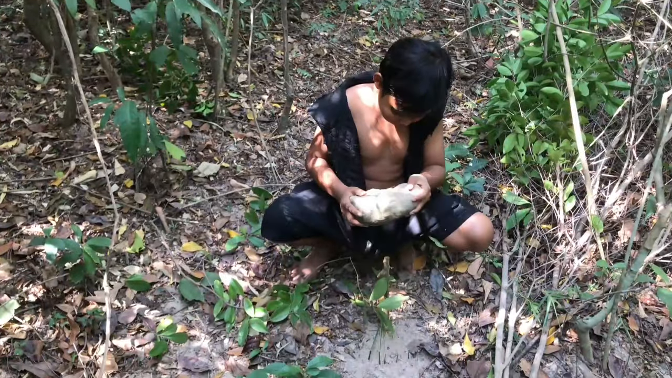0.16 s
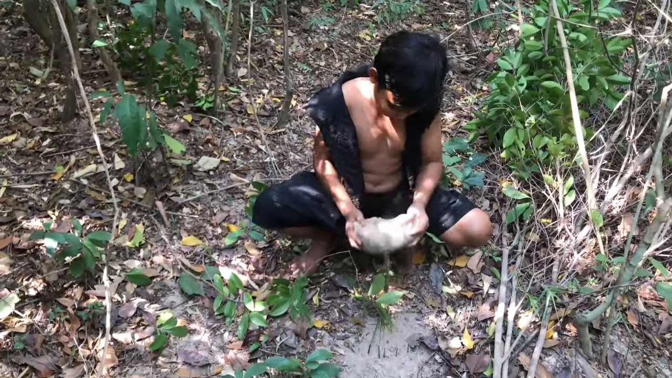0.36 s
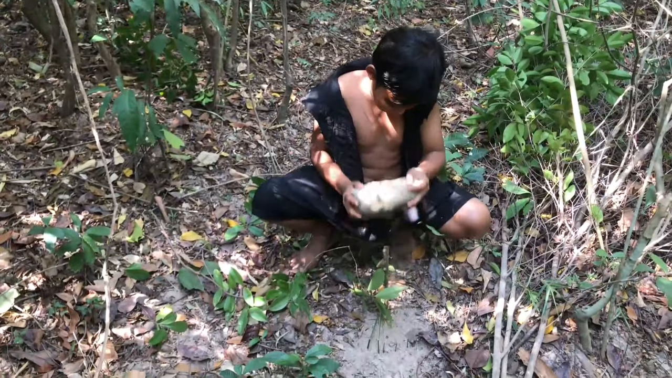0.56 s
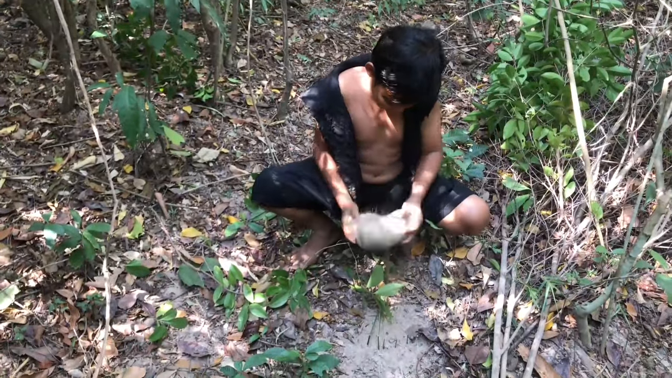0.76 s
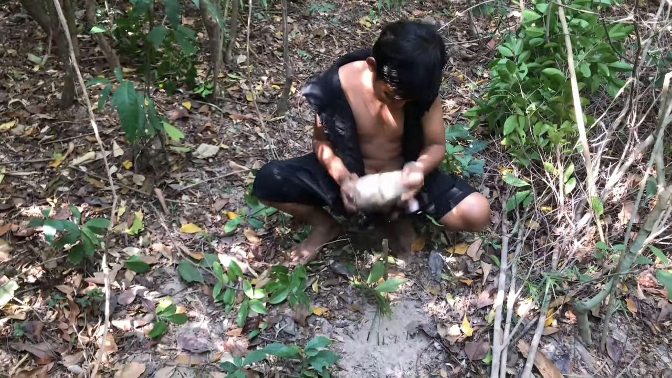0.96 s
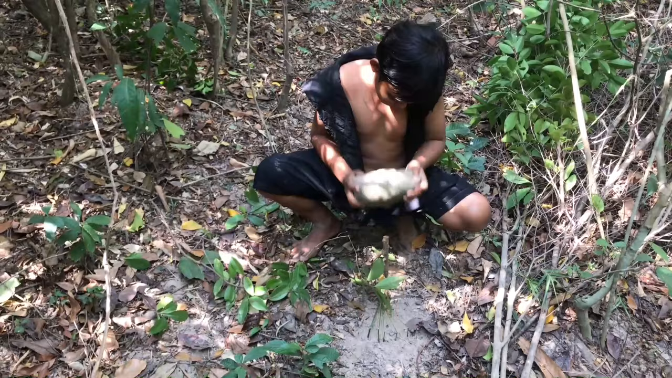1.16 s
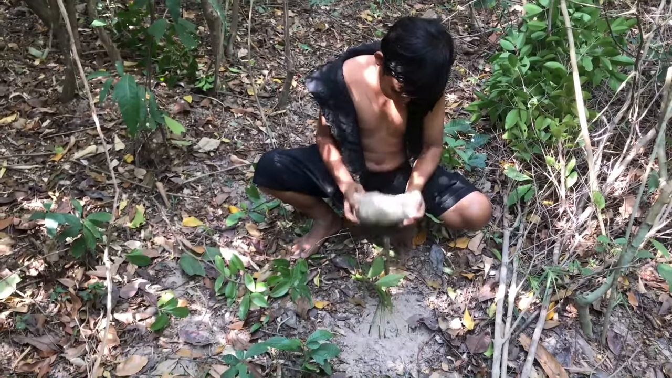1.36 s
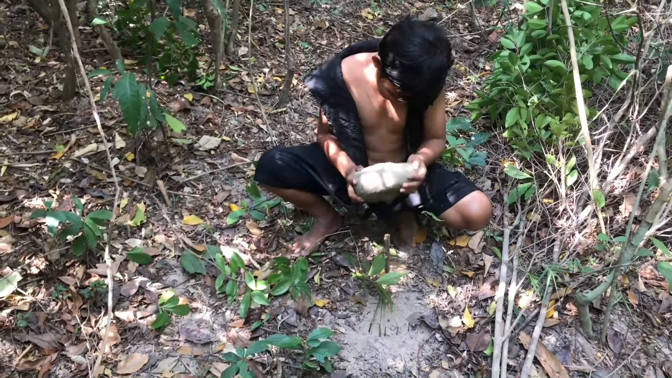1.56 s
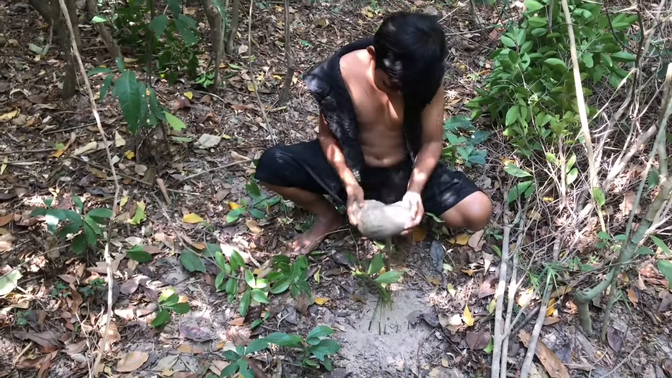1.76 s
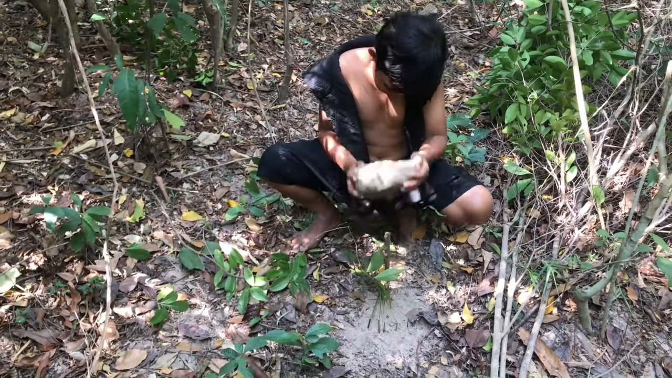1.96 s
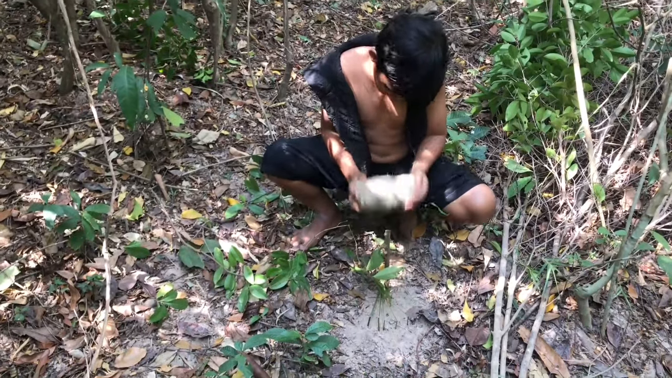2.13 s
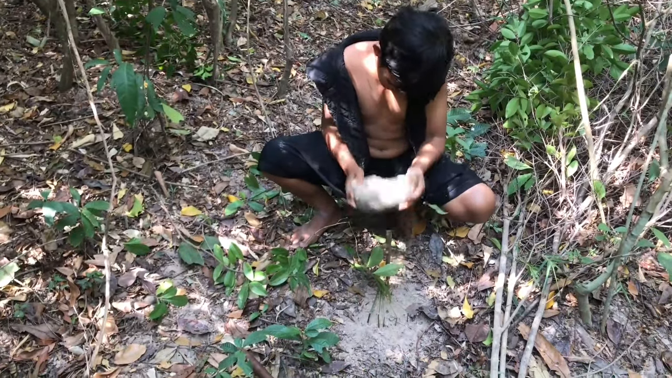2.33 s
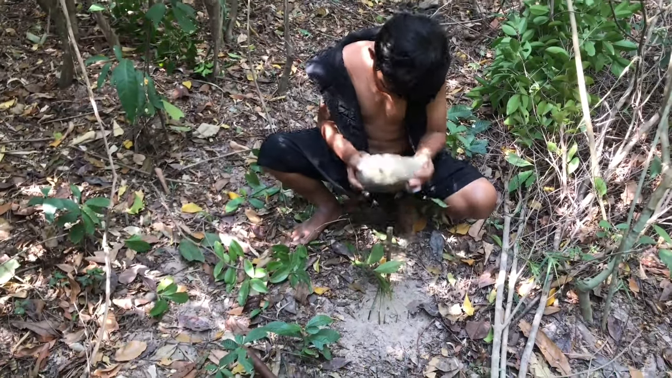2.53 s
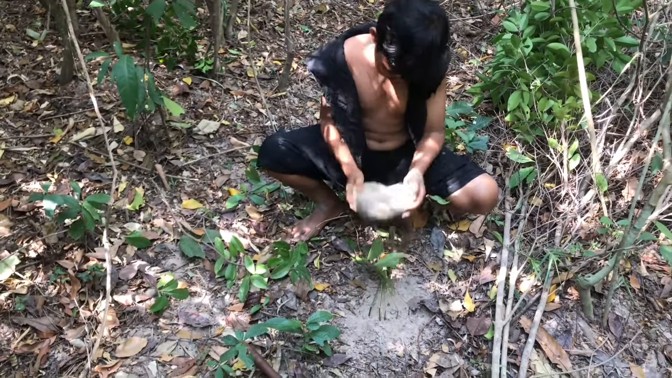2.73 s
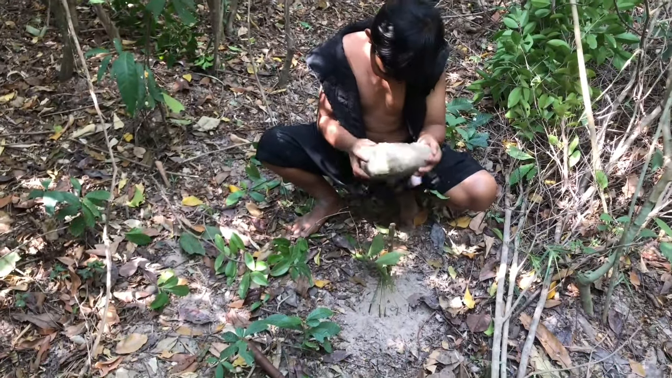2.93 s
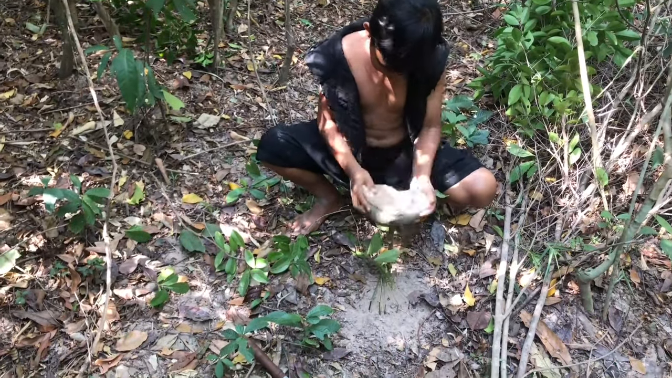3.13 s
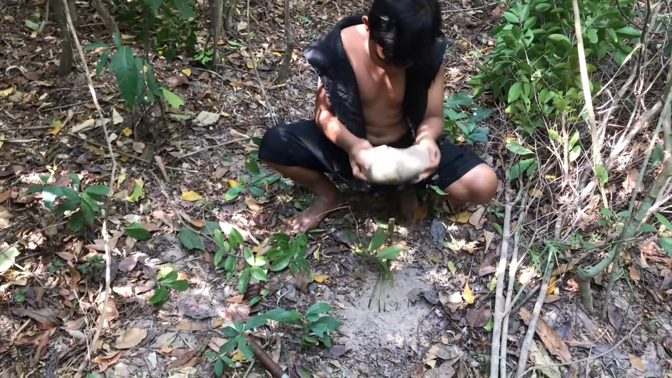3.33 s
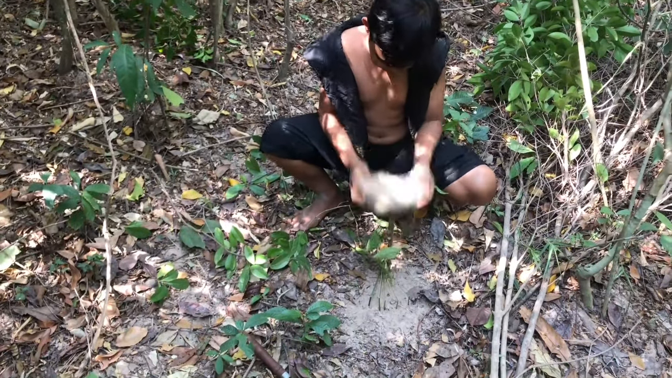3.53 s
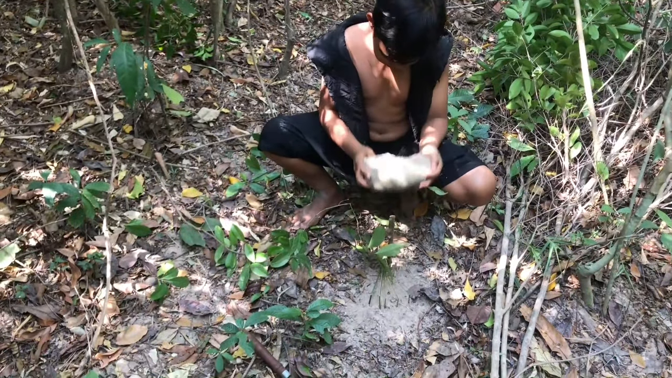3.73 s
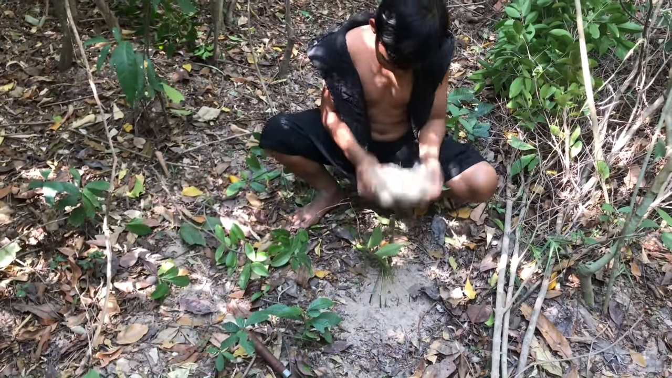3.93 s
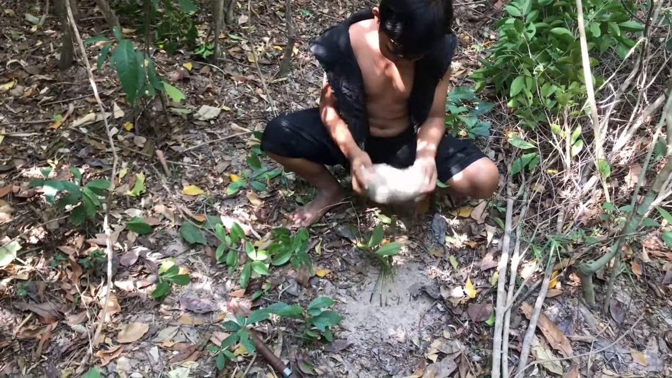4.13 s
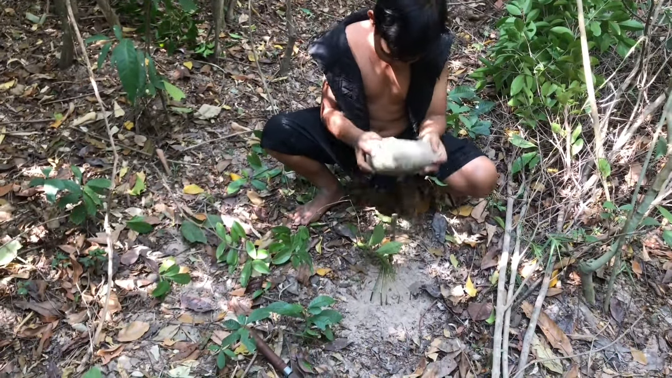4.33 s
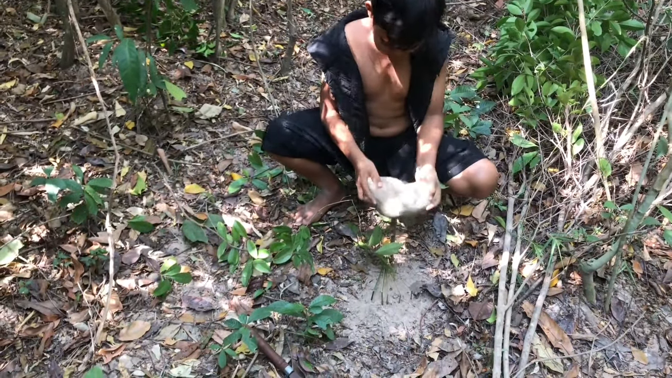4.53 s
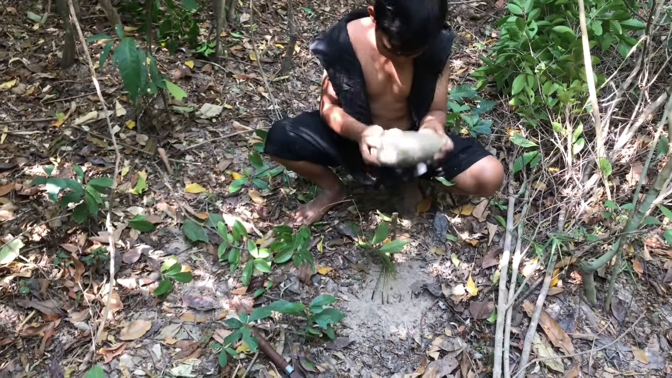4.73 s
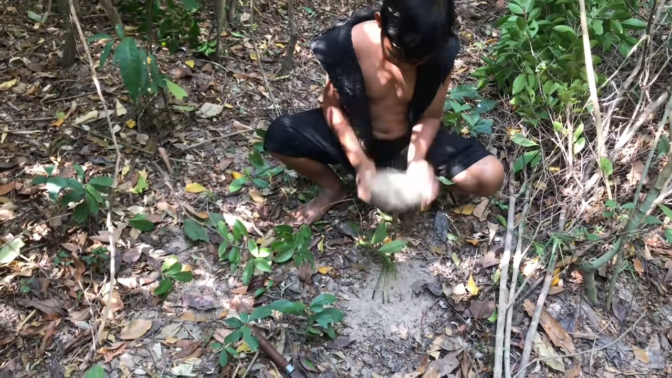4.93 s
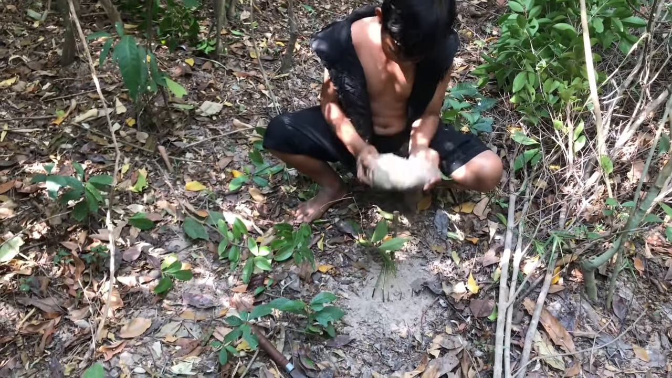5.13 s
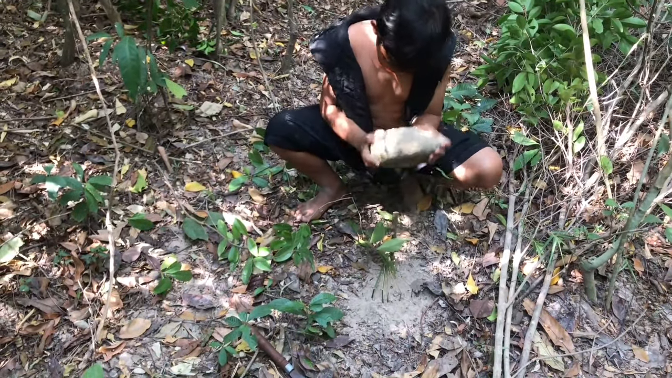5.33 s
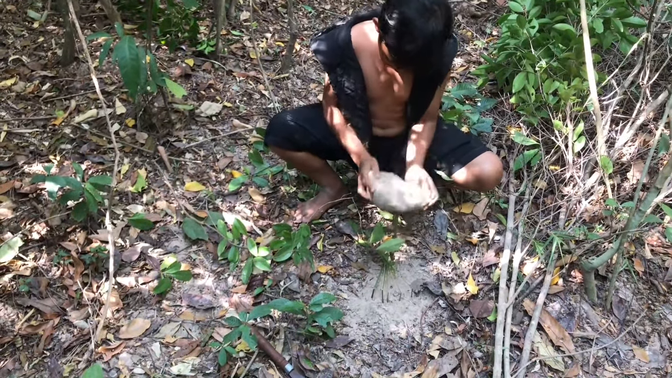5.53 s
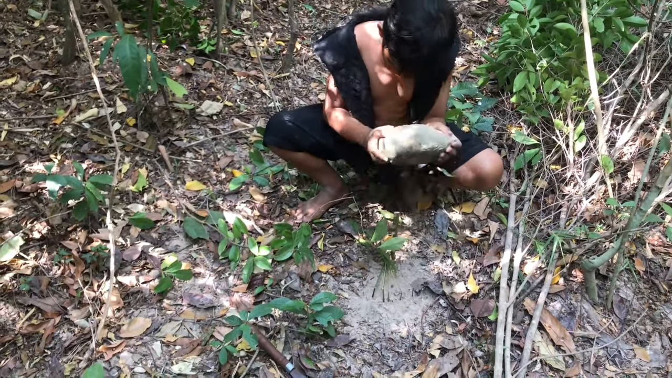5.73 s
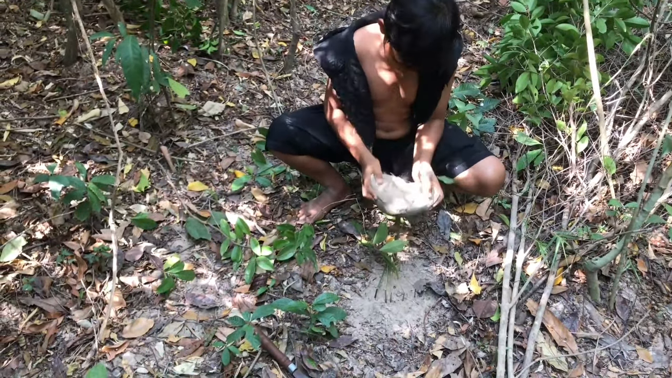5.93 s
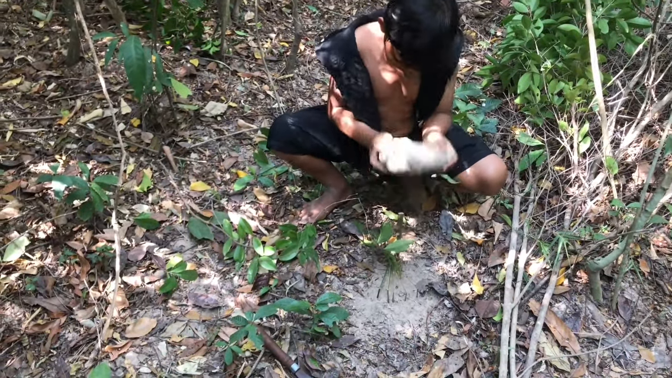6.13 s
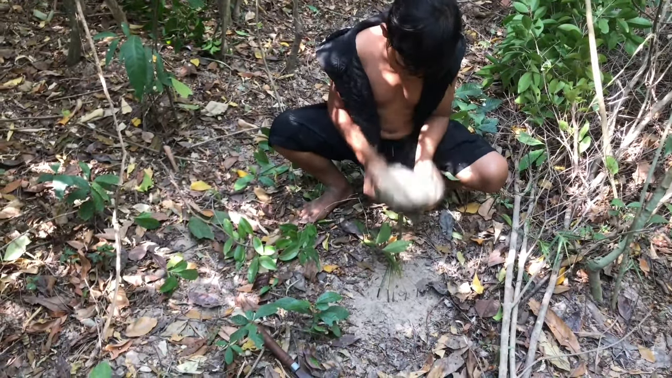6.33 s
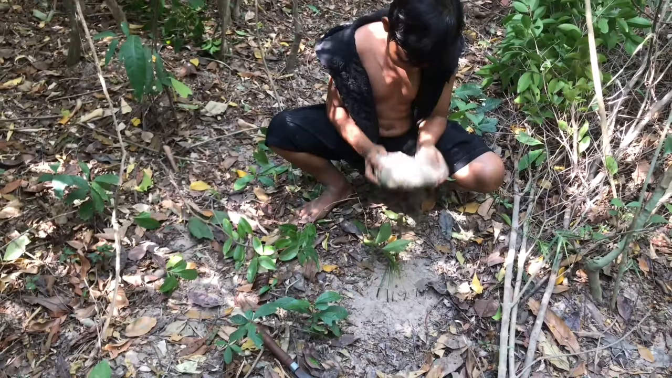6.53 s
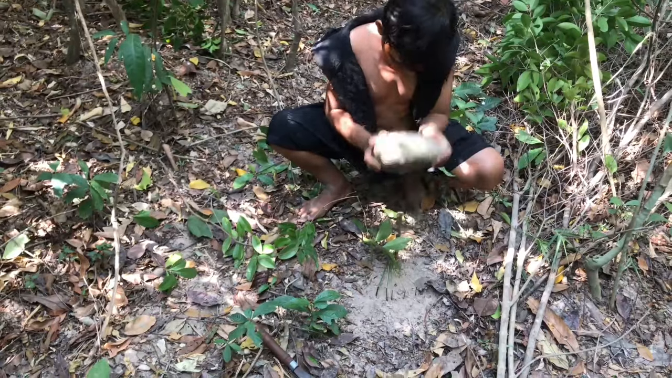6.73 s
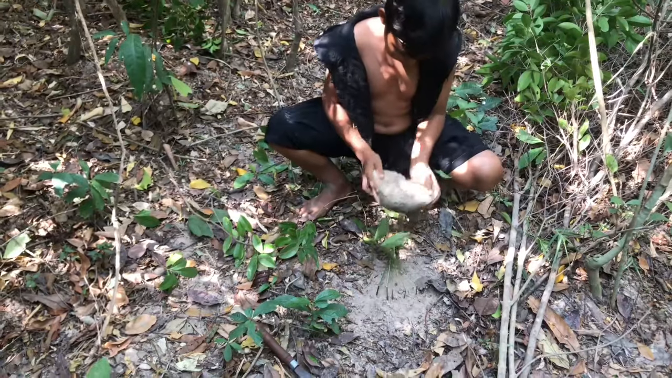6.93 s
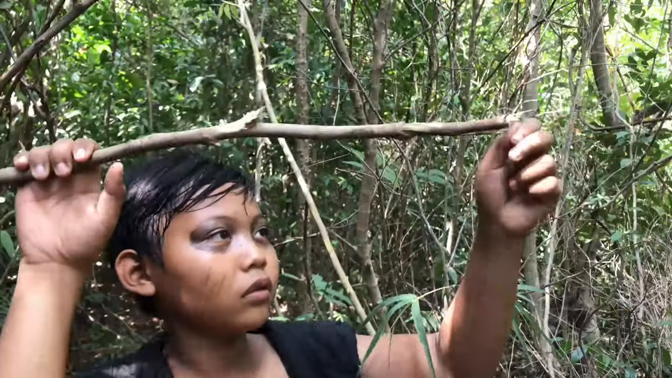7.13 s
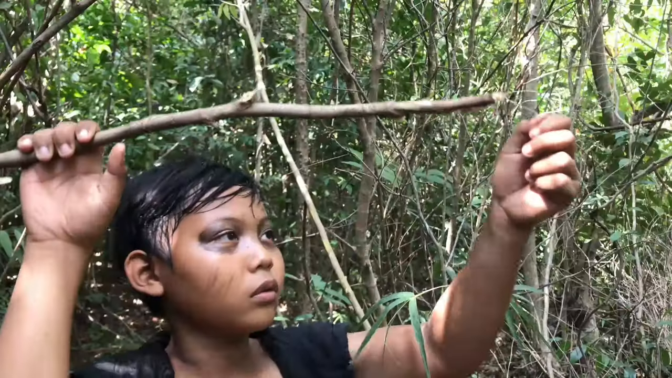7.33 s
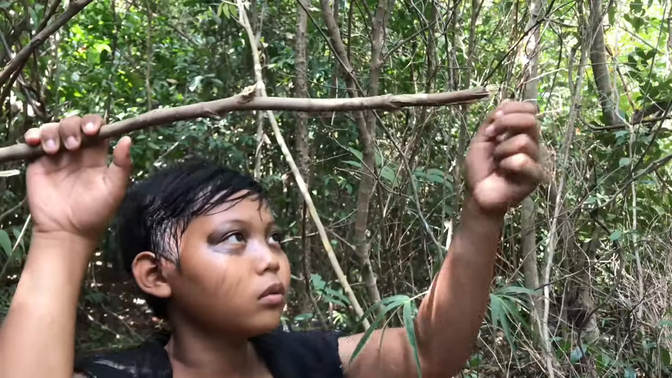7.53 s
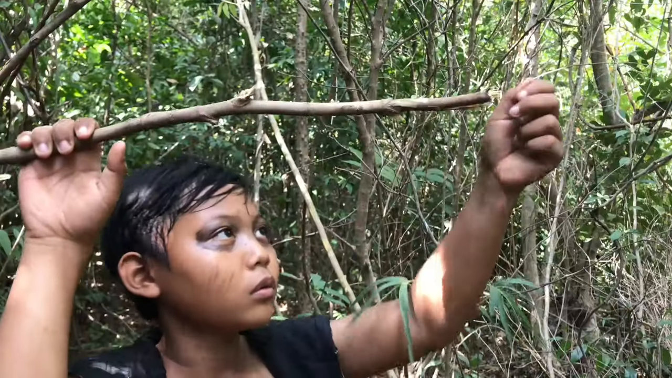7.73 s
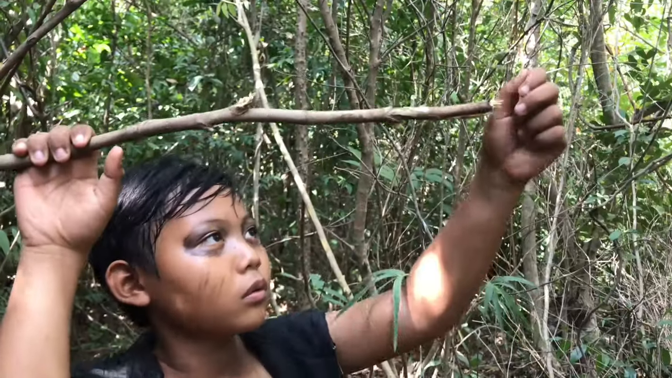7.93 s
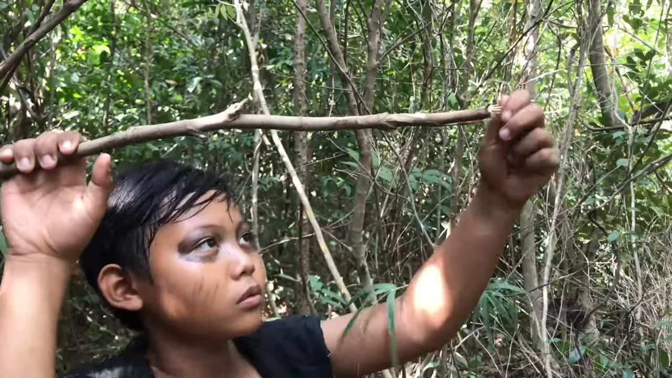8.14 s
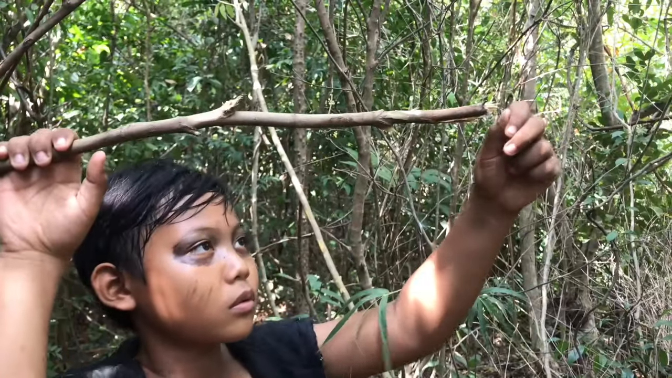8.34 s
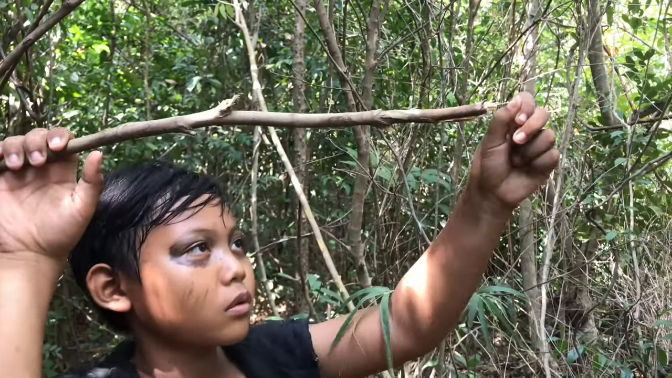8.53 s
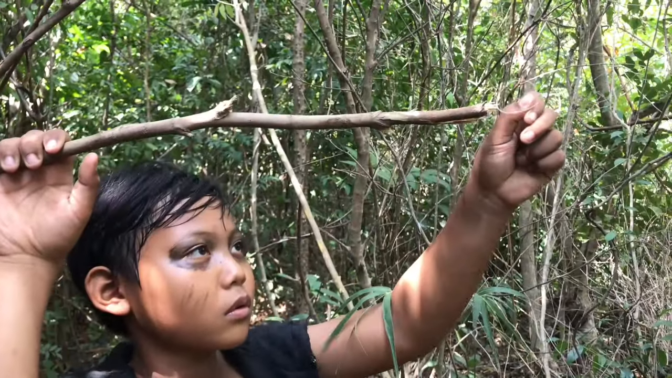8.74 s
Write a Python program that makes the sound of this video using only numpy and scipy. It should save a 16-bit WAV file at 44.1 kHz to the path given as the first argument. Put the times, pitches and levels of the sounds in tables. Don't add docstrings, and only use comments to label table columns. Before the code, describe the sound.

Fifteen regular blows of stone on wood and ground, light at first and harder toward the end, with bounces and small dry leaf ticks around them. Low bumps shake the microphone stand late on. At seven seconds the pounding cuts off with a tiny click, leaving a distant wavering engine hum, soft air noise, microphone hiss and sparse leaf rustles. Open woodland, little echo.

```python
import sys
import numpy as np
from scipy import signal
from scipy.fft import rfft, irfft
from scipy.io import wavfile
from scipy.ndimage import uniform_filter1d

SR = 44100
rng = np.random.default_rng(int(sys.argv[2]) if len(sys.argv) > 2 else 0)


def amplitude_ratio(level_db):
    exponent = np.asarray(level_db, float) / 20
    return 10 ** exponent


def pcm_store(signal):
    levels = np.round(np.clip(np.atleast_2d(signal), -1, 1) * 32767)
    wavfile.write(sys.argv[1], SR, levels.astype(np.int16).T)


N = 387198
CUT_S = 7.0232

# (time [s], level [dB], upper level [dB], upper frequency [Hz], hiss level [dB])
CRACKS = [(.3007, -30, 3, 3780, -15), (.7504, -38, 1, 3750, -14), (1.2198, -39.5, 7, 6260, 4),
          (1.6967, -38, 0, 4670, 3.5), (2.1552, -31, -10, 3470, -11), (2.5929, -28.5, -5, 4300, -9),
          (3.0745, -28.5, -6, 4930, -8), (3.5295, -34, -6, 3740, -1.5), (3.96, -33.5, -3, 3680, -11),
          (4.4412, -28, -13, 3770, -12), (4.9462, -28, -11, 3200, -16), (5.4222, -34, .5, 3530, -13),
          (5.8847, -27.5, -5, 3160, -13), (6.344, -29, 0, 3810, -5), (6.8014, -32, 4, 3200, -17)]
# (time [s], level [dB], upper level [dB], upper frequency [Hz], hiss level [dB])
CRACK_BOUNCES = [(1.225, -30.5, -3.5, 3450, -8), (1.704, -40, 2, 6400, -11), (2.1623, -30.5, -1, 3600, -15),
                 (2.6018, -29, -7, 3470, -14), (2.6105, -39, -13, 3670, -17), (3.9629, -33.5, -5, 4930, 3),
                 (3.9718, -30.5, -6, 3500, -21), (4.4585, -50, -6, 4340, 9.5), (5.4245, -35, 1, 4400, 6),
                 (5.4285, -47, 3, 4730, 5), (5.891, -44, 5.5, 3630, -3), (5.993, -52, -5, 3360, -6),
                 (6.354, -33, -9, 3630, -20), (6.8052, -39.5, 18, 3450, 9), (6.8945, -45, -5, 3130, -18)]


def evened(x):
    return x / np.sqrt(np.mean(x ** 2) + 1e-20)


def read(points, hz):
    f, value = np.transpose(points)
    return np.interp(np.log(hz + 1), np.log(f + 1), value)


def add(mix, s, sound):
    part = mix[round(s * SR):][:len(sound)]
    part += sound[:len(part)]


def band(x, lo_hz, hi_hz):
    sos = signal.butter(2, [lo_hz, min(hi_hz, SR / 2.1)], "band", fs=SR, output="sos")
    return signal.sosfilt(sos, x)


def shaped(spectrum, patchy_db):
    frames, hz = N // 256 + 5, np.fft.rfftfreq(1024, 1 / SR)
    real, imag, patches = rng.standard_normal((frames, 513, 3)).T
    patches = uniform_filter1d(patches, size=12, axis=0)
    patches = evened(uniform_filter1d(patches, size=10, axis=1))
    z = (real + 1j * imag) * amplitude_ratio(read(spectrum, hz)[:, None] + patchy_db * patches)
    return evened(signal.istft(z, nperseg=1024, noverlap=768)[1][:N])


def drone(modes):
    hz = np.fft.rfftfreq(N, 1 / SR)
    gain = sum(amplitude_ratio(db) / (1 + (2 * (hz - f) / width) ** 2) for f, width, db in modes)
    return evened(irfft(rfft(rng.standard_normal(N)) * gain, N))


def envelope(t, rise, t60):
    e = (1 - np.exp(-t / max(rise, 1e-5))) ** 2 * amplitude_ratio(-60 * t / max(t60, 1e-3))
    return e / e.max()


def mode(t, hz, t60, rise):
    return np.sin(2 * np.pi * hz * t) * envelope(t, rise, t60)


def swells(rows, rest_db):
    t = np.arange(N) / SR
    power = sum(amplitude_ratio(2 * db) * np.exp(-2 * ((t - s) / half) ** 2) for s, half, db in rows)
    return np.sqrt(amplitude_ratio(2 * rest_db) + power)


def wind():
    # (middle [s], half length [s], level [dB])
    gusts = [(1.2, .3, -52), (2.08, .2, -53), (3.42, .2, -52), (.35, .15, -55), (5.68, .08, -52),
             (1.0, .08, -50), (6.17, .08, -49), (8.2, .4, -54), (4.25, .2, -54), (5.92, .17, -44),
             (6.55, .17, -49)]
    # (frequency [Hz], width [Hz], level [dB])
    rumble = [(50, 9, 2), (80, 17, 0), (130, 30, -9)]
    return swells(gusts, rest_db=-57) * drone(rumble)


def engine():
    # (frequency [Hz], width [Hz], level [dB])
    hum = [(263.8, 26, 0), (296, 13, -10), (334.7, 17.4, -4)]
    level_db, waver_db, after_cut_db = -53, 1.5, -2
    t = np.arange(N) / SR
    rates_hz = np.geomspace(.3, 3, num=12)
    waver = evened(sum(np.sin(2 * np.pi * (f * t + rng.random())) / np.sqrt(f) for f in rates_hz))
    return amplitude_ratio(level_db + waver_db * waver + after_cut_db * (t > CUT_S)) * drone(hum)


def distant_air():
    # (frequency [Hz], level [dB per Hz])
    air = [(18, -44), (30, -15), (75, -8), (197, -12.5), (265, -1), (349, -9), (400, -13), (490, -14.5),
           (520, -17.5), (570, -16.5), (680, -22.5), (1290, -26.5), (1500, -34), (1950, -68)]
    level_db, after_cut_db = -56, -1
    gain = amplitude_ratio(level_db + after_cut_db * (np.arange(N) > CUT_S * SR))
    return gain * shaped(air, patchy_db=1.5)


def hiss():
    # (frequency [Hz], level [dB per Hz])
    hiss_spectrum = [(900, -20), (1500, 9), (2000, 6.5), (3000, 2.5), (5000, 1), (8000, -3), (10000, -3.5),
                     (14000, -6.5), (14700, -3), (15550, -11), (15850, -46)]
    return amplitude_ratio(-72) * shaped(hiss_spectrum, patchy_db=0.8)


def leaf_rustle():
    # (middle [s], half length [s], level [dB])
    stirs = [(.02, .1, -68), (.54, .05, -56), (.66, .07, -63.5), (.76, .03, -59), (1.06, .12, -65),
             (1.26, .09, -64), (2.08, .12, -64), (2.5, .12, -70.5), (3.4, .3, -73), (5.1, .15, -72),
             (5.47, .07, -62), (5.92, .07, -64.5), (6.9, .25, -71), (7.41, .1, -65.5), (7.99, .03, -67),
             (8.25, .03, -69.5), (7.6, .2, -72), (8.48, .03, -69), (8.76, .08, -67)]
    # (frequency [Hz], level [dB])
    leaf_spectrum = [(1500, -8), (3000, 1), (5000, -1.5), (8000, -2.5), (11500, -4.5), (14000, 0),
                     (15700, -2), (15950, -29)]
    t = np.arange(1500) / SR
    strength_db = 4 * np.minimum(rng.exponential(1, N), 3)
    crackle = amplitude_ratio(strength_db) * (rng.random(N) < 400 / SR)
    crackle = .75 + evened(signal.oaconvolve(crackle, amplitude_ratio(-60 * t / .009))[:N])
    return amplitude_ratio(-5) * swells(stirs, rest_db=-77) * evened(crackle * shaped(leaf_spectrum, patchy_db=2))


def leaf_snaps():
    # (time [s], level [dB], frequency [Hz])
    ticks = [(.053, -51.5, 4520), (.1058, -43, 13900), (.5374, -50, 3160), (.5603, -40, 4550),
             (.5744, -48, 13800), (.7342, -47, 3700), (1.029, -49, 3400), (1.0897, -46, 3440),
             (1.282, -46, 3310), (1.347, -44.5, 4500), (1.3646, -48, 4470), (1.8468, -49, 3200),
             (2.2912, -50, 12900), (2.4523, -51, 3080), (2.4778, -48, 3250), (2.801, -46.5, 14300),
             (3.773, -45, 14500), (4.4738, -46, 2510), (4.7833, -35, 3900), (5.062, -48, 3230),
             (5.0742, -44.5, 4450), (5.25, -47, 8100), (5.418, -39, 3470), (5.7522, -38, 3500),
             (5.92, -49, 4230), (6.099, -40.5, 4940), (6.4363, -46.5, 6900), (6.971, -41, 2300),
             (7.426, -51, 3850), (8.5907, -52, 2490),
             (.48, -56, 3610), (.4973, -52, 4730), (.6439, -51, 10100), (.6828, -51, 7830),
              (.7233, -53, 6000), (1.0777, -49, 9810), (1.1154, -50, 6660), (1.2914, -51, 6090),
              (1.3343, -50, 5830), (1.387, -53, 3660), (1.157, -50, 11000), (1.6501, -51, 14600),
              (3.05, -44.5, 3500), (3.5103, -51, 3160), (5.4074, -52, 3220), (5.527, -52, 4190),
              (4.771, -54, 9000), (4.808, -54, 12000), (5.13, -52, 14000), (5.144, -53, 14500),
              (1.448, -52, 10000), (1.003, -54, 13500)]
    out, t = np.zeros(N), np.arange(1500) / SR
    for s, db, hz in ticks:
        noise = rng.standard_normal(len(t))
        snap = .6 * np.sin(2 * np.pi * hz * t)
        snap = snap + evened(band(noise, .55 * hz, 1.5 * hz))
        snap = snap + .5 * evened(band(noise[::-1], 1600, 17000))
        add(out, s, amplitude_ratio(db - 11) * snap * envelope(t, rise=0.00025, t60=.008))
    return out


def peg_knocks():
    # (time [s], level [dB], frequency [Hz], low mode level [dB], high mode level [dB])
    knocks = [(.3003, -29, 1360, -17, -25), (.7494, -36.5, 810, -7, -6), (1.2195, -29.5, 924, -14.5, -6.5),
              (1.697, -34, 810, -13, -1.5), (2.1553, -22, 844, -10.5, -22), (2.5947, -19, 794, -8, -13),
              (3.0748, -23, 750, -2.5, -14), (3.5297, -31.5, 813, -.5, -8), (3.9605, -21.5, 855, -7, -12),
              (4.441, -29, 780, 2, -5), (4.946, -26.5, 780, 0, -1), (5.4218, -27, 890, -1, -9),
              (5.8848, -30, 800, 4.5, -1), (6.3444, -17, 875, -19, -22), (6.802, -13, 950, -18, -13)]
    # (time [s], level [dB], frequency [Hz], low mode level [dB], high mode level [dB])
    knock_bounces = [(1.2247, -30, 815, -10, -7), (1.7047, -38, 880, 3.5, -2),
                     (2.161, -30.5, 836, -1.5, -2), (2.602, -32, 900, -16, -4), (2.61, -39, 930, 2, 0),
                     (3.537, -45, 1150, -16, -20), (1.284, -53, 1000, -8, -8), (6.38, -45, 950, -10, -4),
                     (3.9641, -30.5, 950, -1, -15), (3.9726, -37, 915, 8, -1), (4.4575, -40, 1050, 4, -4),
                     (5.4255, -22, 720, -19, -10), (5.4295, -25, 800, -21, -8), (5.891, -39, 700, 2, -3),
                     (5.995, -47, 775, -13, -3), (6.2835, -51, 790, 2, -20), (6.354, -36, 1000, -6, -4),
                     (6.36, -41, 1020, 5, 6), (6.8064, -17, 760, -24, -14), (6.812, -30, 1000, -20, -6),
                     (6.8947, -35, 700, 9, -5), (6.934, -60, 950, -9, 5), (6.996, -54, 520, 8, -14)]
    peg_t60_s, hard_db, longer_s_per_db = .009, -18, .00025
    out, t = np.zeros(N), np.arange(3000) / SR
    for s, db, hz, low_db, high_db in knocks + knock_bounces:
        t60 = (peg_t60_s + longer_s_per_db * (hard_db - db)) * 820 / hz
        main = mode(t, hz, t60, rise=0.00096)
        low = amplitude_ratio(low_db) * mode(t, hz=354, t60=0.0076, rise=0.0036)
        high = amplitude_ratio(high_db) * mode(t, hz=1154, t60=0.0093, rise=0.0011)
        add(out, s, amplitude_ratio(db + 1.5) * (main + low + high))
    return out


def stone_cracks():
    stone_hz = [2020, 1950, 1900, 2050, 2050, 2400, 2140, 2140, 1700, 1700, 2100, 1500, 1900, 2000, 2000,
                1900, 1500, 2400, 1750, 1700, 2070, 1450, 1600, 1900, 2000, 1700, 1500, 1630, 1900, 1450]
    rise_s, grind_share, splinter_share = .0011, .55, .5
    out, t = np.zeros(N), np.arange(3000) / SR
    for (s, db, upper_db, upper_hz, hiss_db), hz in zip(CRACKS + CRACK_BOUNCES, stone_hz):
        grind, splinter, grit, chance = rng.standard_normal((4, len(t)))
        grains = evened(1 + 12 * uniform_filter1d(1. * (abs(chance) > 2.6), size=24))
        grind = evened(band(grind * grains, 1100, 2670)) * envelope(t, 0.00054, 0.02)
        lower = mode(t, hz, .0048, rise_s) + grind_share * grind
        splinter = evened(band(splinter, .72 * upper_hz, 1.4 * upper_hz)) * envelope(t, 0.0009, 0.0085)
        upper = mode(t, upper_hz, 0.0045, rise_s) + splinter_share * splinter
        coarse = evened(band(grit * grains, 6000, 11900))
        fine = evened(band(grit[::-1] * grains, 12700, 15200))
        crushed = (coarse + 0.7 * fine) * envelope(t, .0006, 0.028)
        add(out, s, amplitude_ratio(db - 3.5) * (lower + amplitude_ratio(upper_db + 1) * upper + amplitude_ratio(hiss_db - 11.5) * crushed))
    return out


def further_rings():
    # (time [s], level [dB], frequency [Hz], decay t60 [s])
    short_rings = [(.301, -50, 800, .015), (.311, -56, 3800, .02), (.751, -42, 370, .02), (1.221, -42, 330, .03),
                   (1.225, -44, 6500, .006), (2.1625, -44, 4950, .005), (2.602, -46, 5000, .005),
                   (2.596, -38, 1700, .01), (3.076, -36, 370, .02), (3.535, -53, 3300, .015),
                   (3.539, -48, 1200, .032), (3.542, -54, 1900, .015), (3.961, -39, 390, .015),
                   (3.963, -46, 6200, .005), (4.445, -42, 900, .02), (4.475, -53, 1200, .025),
                   (4.948, -36, 340, .02), (5.423, -37, 1000, .012), (5.885, -41, 4700, .005),
                   (6.347, -42, 1500, .015), (6.357, -43, 1150, .03), (6.8052, -32, 5000, .005),
                   (6.803, -30, 600, .012), (6.813, -44, 1050, .03), (6.856, -55, 950, .04),
                   (5.894, -48, 1250, .025), (5.993, -52, 1250, .025), (6.928, -55, 1100, .03),
                   (6.928, -66, 3600, .02), (4.4415, -40, 2500, .005), (6.345, -40, 2900, .005),
                   (3.0755, -37, 1800, .006)]
    spread = 1.25
    out, t = np.zeros(N), np.arange(3000) / SR
    for s, db, hz, t60 in short_rings:
        noise = evened(band(rng.standard_normal(len(t)), hz / spread, hz * spread))
        ring = .6 * np.sin(2 * np.pi * hz * t) + .45 * noise
        add(out, s, amplitude_ratio(db) * ring * envelope(t, .21 * t60, t60))
    return out


def clearing(x):
    # (frequency [Hz], decay t60 [s])
    decay = [(150, 0.36), (500, 0.078), (1000, .12), (3000, 0.094), (8000, 0.15), (15000, 0.14)]
    taps = np.zeros((3, SR // 2))
    at = np.arange(100, SR // 2 - 20, 20)
    at = at + rng.integers(0, 20, (3, len(at)))
    np.put_along_axis(taps, at, rng.choice([-1., 1.], at.shape), axis=1)
    hz, t, z = signal.stft(taps, SR, nperseg=256)
    tails = signal.istft(z * amplitude_ratio(-60 * t / read(decay, hz)[:, None]), SR, nperseg=256)[1]
    turn = np.arange(N) / SR / .46 % 3
    parts = x * (np.floor(turn) == np.arange(3)[:, None])
    return signal.fftconvolve(parts, tails / np.linalg.norm(tails[0]), axes=1)[:, :N].sum(axis=0)


def soil_thuds():
    # (time [s], level [dB], frequency [Hz], decay t60 [s], deep push level [dB])
    thuds = [(.302, -34.5, 190, .05, -6), (.751, -29.5, 190, .055, -15), (1.229, -30, 203, .068, -11),
             (1.697, -32, 241, .03, -4), (1.71, -31.5, 211, .058, -2.5), (2.163, -28, 206, .078, -4),
             (2.595, -22.5, 229, .048, -12), (2.604, -18.5, 201, .067, -14), (3.078, -26, 213, .078, -4.5),
             (3.532, -23, 170, .048, -8), (3.9628, -18.5, 190, .076, -6), (4.4425, -23.5, 181, .055, -8),
             (4.9472, -17.5, 196, .068, -8), (5.425, -29, 203, .06, -15), (5.8845, -20.5, 178, .047, -4),
             (6.348, -19, 191.5, .065, -9), (6.8045, -17.5, 201, .08, -29), (6.9935, -24.5, 296, .055, -20),
             (7.0045, -23.5, 267.4, .05, -20)]
    out, t = np.zeros(N), np.arange(6000) / SR
    for s, db, hz, t60, deep_db in thuds:
        turns = hz * (t + 0.39 * 0.0028 * (1 - np.exp(-t / 0.001)))
        rise = .0048 * max(t60 / .068, .7) ** 1.8
        thud = np.sin(2 * np.pi * turns) * envelope(t, rise, t60)
        deep = amplitude_ratio(deep_db) * mode(t, hz=125, t60=0.018, rise=0.0041)
        add(out, s, amplitude_ratio(db) * (thud + deep))
    return out


def stand_bumps():
    # (time [s], level [dB], start frequency [Hz], decay t60 [s], first jerk [cycles])
    bumps = [
        (6.0015, -21, 110, .085, .11),
        (6.2875, -21.5, 108, .063, .03),
        (6.8965, -7.5, 100, .085, .4),
        (6.961, -24, 95, .06, .03),
    ]
    rest_hz, slows_s = 27, .024
    out, t = np.zeros(N), np.arange(6000) / SR
    for s, db, start_hz, t60, jerk in bumps:
        turns = rest_hz * t + (start_hz - rest_hz) * slows_s * (1 - np.exp(-t / slows_s))
        turns = turns + jerk * (1 - np.exp(-t / .0015))
        swing = np.sin(2 * np.pi * turns) * (1 - np.exp(-t / 0.0043)) * amplitude_ratio(-60 * t / t60)
        add(out, s, amplitude_ratio(db + 1.5) * swing)
    return out


def change_clicks():
    out, step = np.zeros(N), np.exp(-np.arange(400) / 38.0)
    add(out, CUT_S, amplitude_ratio(-44) * step)
    add(out, 7.0277, amplitude_ratio(-39) * step)
    return out


def scene():
    background = wind() + engine() + distant_air() + hiss()
    leaves = leaf_rustle() + leaf_snaps()
    blows = peg_knocks() + stone_cracks() + further_rings()
    first_spot = blows + amplitude_ratio(-14) * clearing(blows) + soil_thuds() + stand_bumps()
    first_spot[round(CUT_S * SR):] = 0
    return (first_spot + change_clicks() + leaves + background)[None]


def band_limit(x):
    return signal.sosfilt(signal.butter(12, 16520, fs=SR, output="sos"), x)


def record(dry):
    # (frequency [Hz], width [Hz], level [dB])
    housing = [(5510, 170, -5.5), (6900, 100, 1.5), (8450, 250, -2), (11470, 440, -5.5)]
    starved = [.515, 1.05, 1.262, 1.955, 2.09, 2.256, 4.02, 4.625, 4.936, 5.555, 5.625, 5.972, 6.855, 8.643]
    x = signal.sosfilt(signal.butter(4, 38, "high", fs=SR, output="sos"), dry)
    hz, t, z = signal.stft(x, SR, nperseg=512, noverlap=384)
    port_db = sum(db / (1 + (2 * (hz - f) / width) ** 2) for f, width, db in housing)
    port_db = port_db - 30 * (hz > 16200)
    kept = np.repeat(rng.random((len(starved), 86)) < .25, 3, axis=1)[:, :len(hz)]
    kept = kept | (hz < 2000)
    dip_db = sum(-18 * ~k[:, None] * np.exp(-((t - s) / .007) ** 4) for s, k in zip(starved, kept))
    x = signal.istft(z * amplitude_ratio(port_db[:, None] + dip_db), SR, nperseg=512, noverlap=384)[1][:, :N]
    return band_limit(x)


dry = scene()
out = record(dry)
pcm_store(out)
```